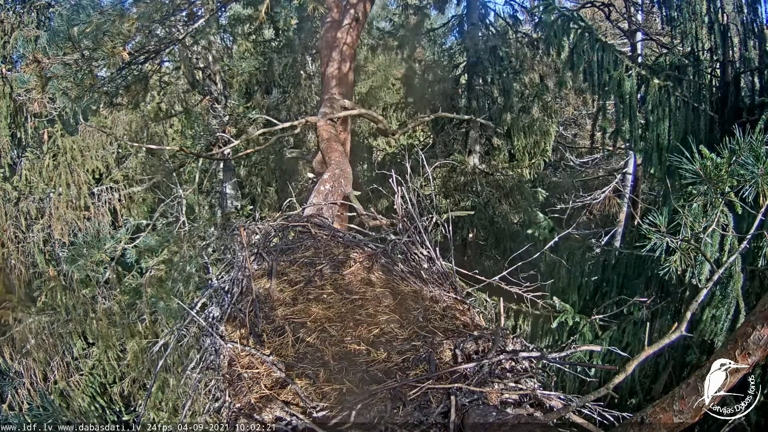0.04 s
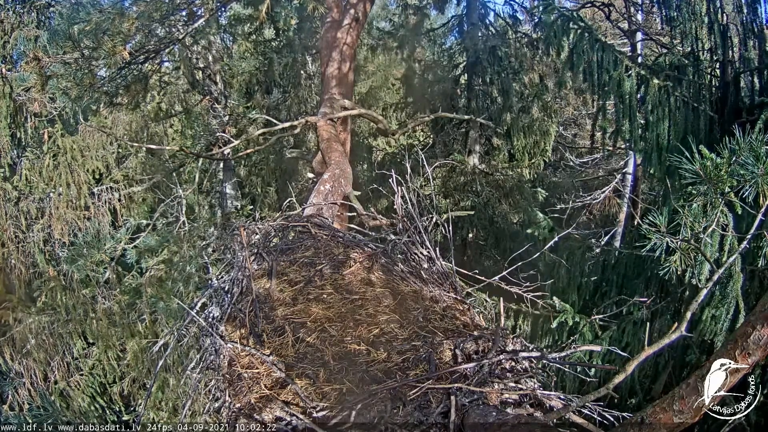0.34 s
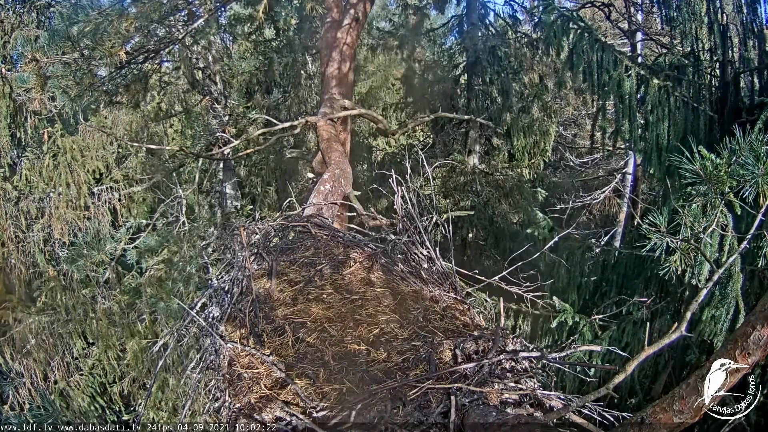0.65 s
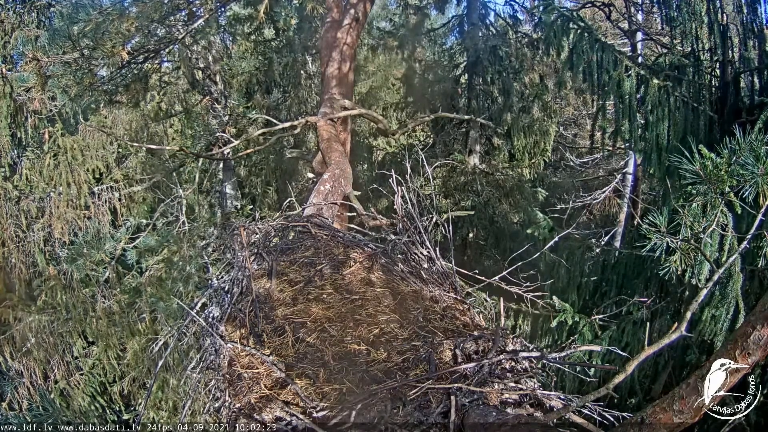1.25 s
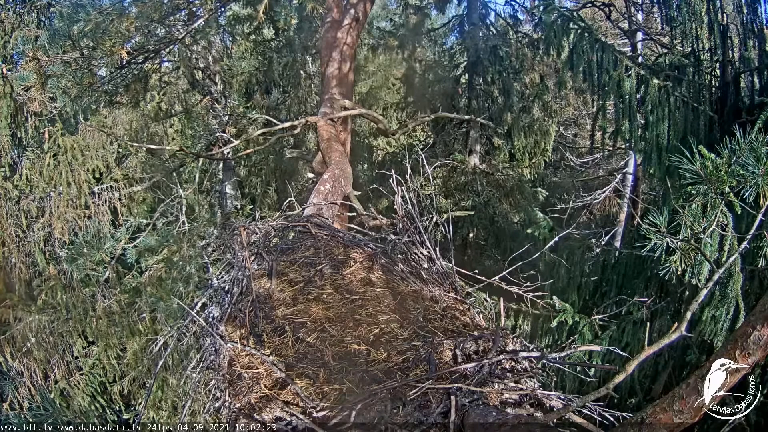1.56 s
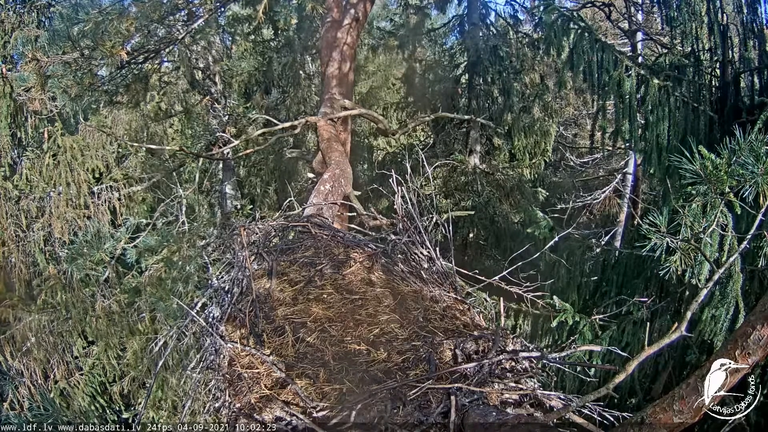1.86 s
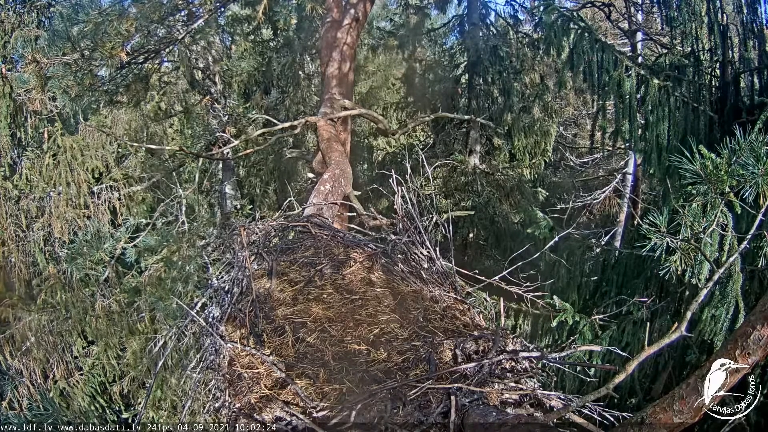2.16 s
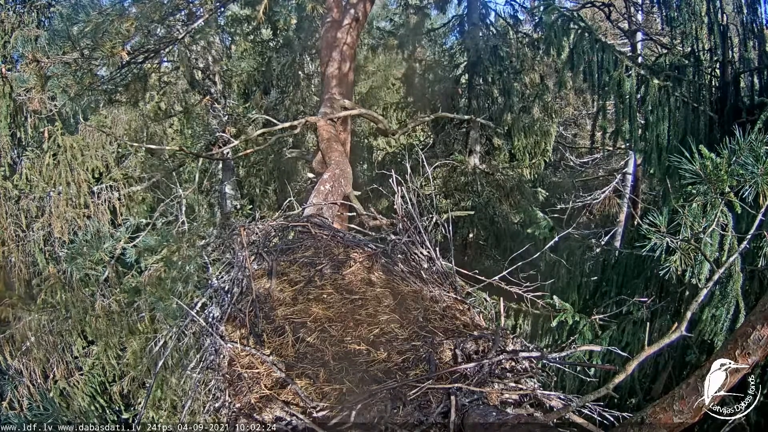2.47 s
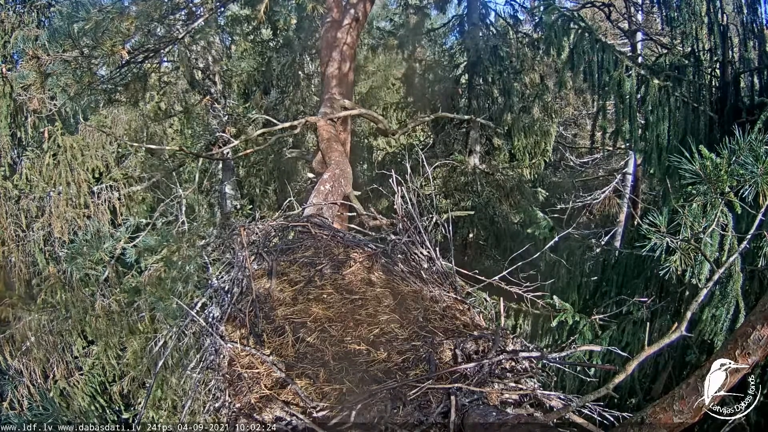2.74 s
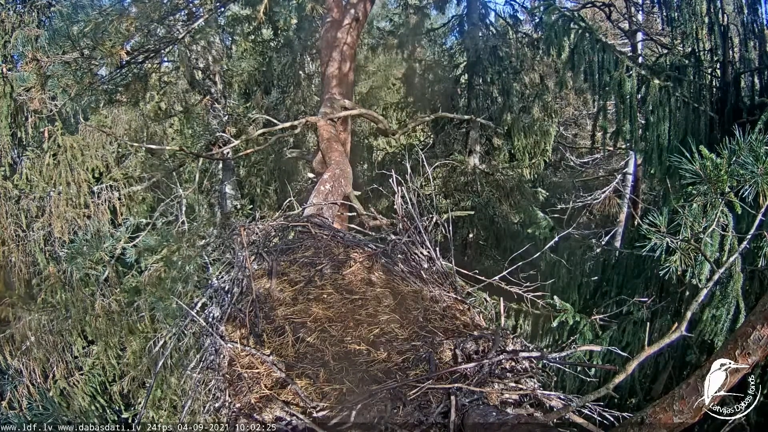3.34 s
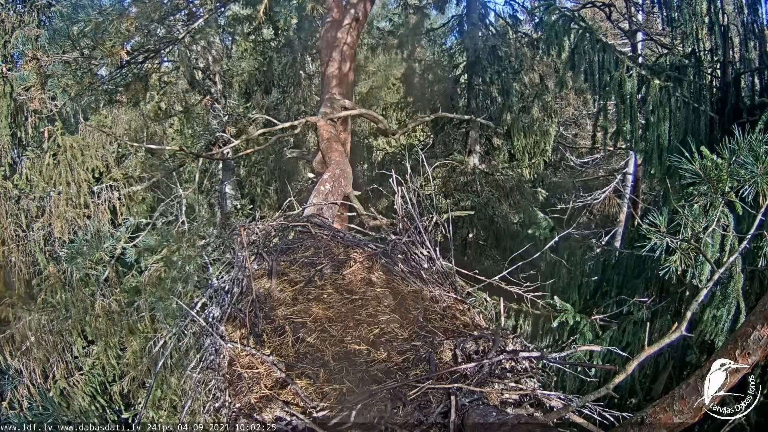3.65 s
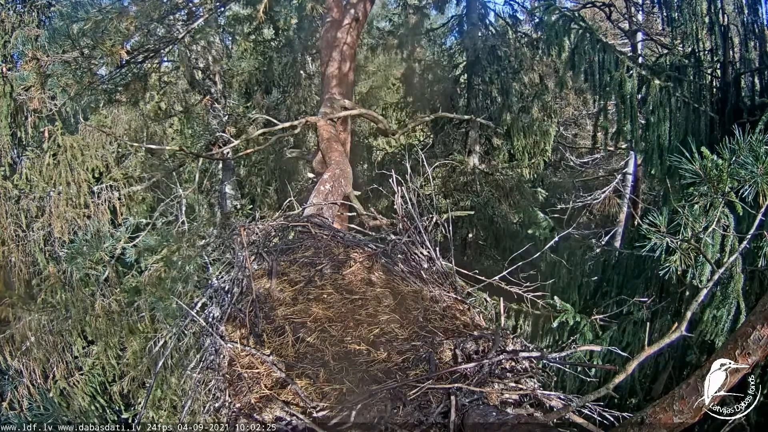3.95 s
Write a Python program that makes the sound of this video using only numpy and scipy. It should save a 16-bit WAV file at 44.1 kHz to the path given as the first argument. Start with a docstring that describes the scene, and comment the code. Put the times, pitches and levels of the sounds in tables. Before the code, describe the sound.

A raven gives three dry, rattling croaks in a quiet forest with faint bird chirps.

```python
"""A conifer forest, heard from a fixed microphone with a raven calling some way off.
Hiss, low rumble and a faint drone lie under distant chirps of small birds and one tick of a twig.
The raven gives three dry, rattling croaks. Each is eight slow beats of the syrinx, a soft opening
and a sharp closing snap, that ring the throat. Branches and trunks scatter the calls."""
import sys
import numpy as np
from scipy import signal
from scipy.fft import rfft, irfft
from scipy.io import wavfile
from scipy.ndimage import uniform_filter1d

SR = 44100
rng = np.random.default_rng(int(sys.argv[2]) if len(sys.argv) > 2 else 0)


def dump(signal):
    """Clip the signal to [-1, 1] and save it as 16-bit WAV at the path in sys.argv[1]."""
    limited = np.clip(np.atleast_2d(signal).T, -1, 1)
    pcm = np.round(limited * 32767).astype(np.int16)
    wavfile.write(sys.argv[1], SR, pcm)


N = 176400


def undb(db):
    """Decibels to gain."""
    return 10 ** (np.asarray(db) / 20)


def unit(x):
    """Scale to rms 1."""
    return x / np.sqrt(np.mean(x ** 2))


def add(out, start, sound):
    """Mix a sound in at a time in seconds."""
    i = int(np.clip(start * SR, 0, N - 1))
    out[i:i + len(sound)] += sound[:N - i]


def noise(points):
    """Noise of rms 1, its spectrum drawn through (Hz, dB) points."""
    hz, db = np.array(points, float).T
    bins_hz = np.maximum(np.fft.rfftfreq(N, 1 / SR), 1)
    gain = undb(np.interp(np.log(bins_hz), np.log(hz), db, left=-100, right=-100))
    return unit(irfft(rfft(rng.standard_normal(N)) * gain, N))


# The hiss and the rumble around the microphone. Each row: frequency in Hz, relative level in dB.
HISS_SPECTRUM = [(88, -15), (150, -2.5), (171, -2), (265, -4), (296, -5), (336, -2.5), (404, -8),
                 (713, -9.5), (1130, -13), (1850, -13.5), (2260, -9.5), (2870, -13.5), (3390, -17),
                 (12000, -19), (15600, -53), (22000, -120)]
RUMBLE_SPECTRUM = [(4, -4), (12, -1), (26, -3), (38, -6.5), (80, -5.5), (110, -13.5), (150, -14.5),
                   (220, -55.5)]


def forest_air():
    """Even hiss over a low rumble."""
    return undb(-60.5) * noise(HISS_SPECTRUM) + undb(-57) * noise(RUMBLE_SPECTRUM)


# The drone's course at the microphone. Each row: time in seconds, level in dB.
DRONE_LEVELS = [(0, -76), (1.15, -89), (1.4, -63), (3.0, -61.5), (4.0, -65.5)]


def drone(hz=68.4, skirt_hz=6.8):
    """A faint, narrow band of low noise that comes up after a second."""
    hum = noise([(hz - skirt_hz, -25), (hz, 0), (hz + skirt_hz, -25)])
    level_db = np.interp(np.arange(N) / SR, *np.array(DRONE_LEVELS).T)
    return undb(level_db) * hum


# Small birds, far off. Each row: start and length in seconds, first and last pitch in Hz, level in dB.
FAR_CHIRPS = [(0.193, 0.021, 3330, 3670, -67), (.26, .025, 3430, 3750, -70),
              (0.338, 0.022, 3320, 3770, -66), (0.441, 0.033, 3280, 3970, -70),
              (0.702, .033, 3200, 2870, -59), (1.339, 0.041, 3250, 2520, -62),
              (1.345, 0.022, 3770, 3580, -64), (1.52, .035, 3030, 3960, -63),
              (1.559, 0.06, 3960, 4510, -69), (2.183, .03, 3300, 3370, -65),
              (2.261, 0.036, 3200, 2720, -56.5), (3.25, 0.023, 3150, 2750, -66),
              (3.572, .13, 7400, 7850, -72), (3.9, 0.085, 7470, 7850, -69)]


def small_birds(waver_depth=0.028):
    """Short, slightly wavering whistled glides."""
    out = np.zeros(N)
    for start, length, from_hz, to_hz, db in FAR_CHIRPS:
        along = np.linspace(0, 1, int(length * SR))
        waver = unit(uniform_filter1d(rng.standard_normal(SR), size=120))[:len(along)]
        hz = (from_hz + (to_hz - from_hz) * along ** 1.32) * (1 + waver_depth * waver)
        arch = np.sqrt(4 * along * (1 - along))
        add(out, start, undb(db) * arch * np.sin(2 * np.pi * np.cumsum(hz) / SR))
    return out


# Reverberation among the trunks.
# Each row: low and high band edge in Hz, time to fall 60 dB in seconds, level in dB.
TRUNK_TAIL = [(200, 670, 0.93, -12.5), (600, 1600, 1.26, -9), (1930, 7900, 1.1, -1.5)]


def tree_scatter(calls, near_delay_s=0.0065, build_s=0.0052):
    """Quick scatter from nearby branches and a long diffuse tail from the trunks."""
    t = np.arange(2 * SR) / SR
    near = t * np.exp(-t / near_delay_s)
    response = undb(-8.5) * rng.standard_normal(len(t)) * near / np.sqrt(np.sum(near ** 2))
    for low_hz, high_hz, t60, db in TRUNK_TAIL:
        band = signal.butter(3, [low_hz, high_hz], "band", fs=SR, output="sos")
        echoes = signal.sosfilt(band, rng.standard_normal(len(t)))
        fade = np.exp(-np.log(1000) * t / t60) * (1 - np.exp(-t / build_s))
        response += undb(db) * echoes * fade / np.sqrt(np.sum(fade ** 2))
    return signal.fftconvolve(calls, response)[:N]


RISE_S = .003  # time allowed for a resonance to swell


def ring(t, hz, width_hz, lag_s_per_hz=1.3e-7):
    """A resonance that swells quickly and dies three times more slowly; higher ones crest a bit later."""
    since = t - RISE_S - lag_s_per_hz * hz
    age = np.pi * width_hz * since
    envelope = np.exp(-np.logaddexp(-3 * age, age))
    return envelope * np.cos(2 * np.pi * hz * since)


def twig(at_s=.7372):
    """A twig gives one small dry tick."""
    out = np.zeros(N)
    tick = ring(np.arange(SR // 20) / SR, hz=2200, width_hz=700)
    add(out, at_s - RISE_S, undb(-40) * tick)
    return out


def air_pulse(resonances, rasp_db=-8, rasp_decay_s=0.003):
    """One push of air with a trail of turbulence, through resonances (Hz, width in Hz, dB)."""
    t = np.arange(SR // 40) / SR
    trail = np.exp(-t / rasp_decay_s) * np.sqrt(2 / (rasp_decay_s * SR))
    push = undb(rasp_db) * rng.standard_normal(len(t)) * trail
    push[0] += 1
    throat = sum(undb(db) * ring(t, hz, width) for hz, width, db in resonances)
    return signal.fftconvolve(push, throat)[:len(t)]


# The raven's throat resonances besides the main one.
# Each row: frequency and width in Hz, gain in the snap and in the opening in dB.
THROAT_RESONANCES = [(344, 59, -18.5, -19.5), (500, 140, -25, -21), (643, 95, -26, -22.5),
                     (1100, 200, -25, -20), (1437, 186, -14.5, -27), (1830, 380, -19.5, -21.5),
                     (2464, 340, -13.5, -16), (2770, 316, -7, -22.5), (3210, 410, -14.5, -29),
                     (4050, 770, -20, -18.5)]


def syrinx_beat(main_hz, tuning):
    """The sharp closing snap and the soft opening of one beat, each ringing the throat."""
    snap, opening = [(main_hz, 207, 0)], [(main_hz, 116, -3.5)]
    for hz, width, snap_db, opening_db in THROAT_RESONANCES:
        snap.append((hz * tuning, width, snap_db))
        opening.append((hz * tuning, width, opening_db))
    return air_pulse(snap), air_pulse(opening)


def croak(rate, start, db, swell_db, from_hz, to_hz, tuning, second_db, last_db, beats=8):
    """A run of syrinx beats; the call swells and its main resonance rises as the bill opens."""
    opening_lead_s, opening_swell_db = .007, 6.5
    snap_jitter_s, opening_jitter_s, shimmer_db = .00008, .00019, 1.14
    out = np.zeros(N)
    for k, chance in enumerate(rng.standard_normal((beats, 4))):
        along, last = k / (beats - 1), k == beats - 1
        when = start - RISE_S + k / rate + .003 * last  # the syrinx slackens: the last beat is late
        snap, opening = syrinx_beat(from_hz + (to_hz - from_hz) * along, tuning)
        held_back = (1 - along) ** 2
        beat_db = db - swell_db * held_back + last_db * last
        snap_db = beat_db + second_db * (k == 1) + shimmer_db * chance[1]
        opening_db = beat_db - opening_swell_db * held_back + shimmer_db * chance[3]
        add(out, when + snap_jitter_s * chance[0], snap * undb(snap_db))
        add(out, when - opening_lead_s + opening_jitter_s * chance[2], opening * undb(opening_db))
    return out


# The raven, some way from the microphone. Each row: first snap in seconds, full level and swell in dB,
# main resonance at start and end in Hz, throat tuning as a ratio, then gains in dB for the second snap,
# the last beat, the direct treble and the treble sent into the trees.
RAVEN_CROAKS = [(0.8129, -32.5, 0.5, 915, 980, 1.005, -10, 0.5, 1.5, -1),
                (2.4342, -32.5, 1.5, 893, 915, 1, -4, -6.5, -0.5, 1),
                (3.3458, -29, 7, 820, 1006, 1.024, 1.5, -2.5, -8, 1.5)]
# The pace of each croak, in beats per second.
BEAT_RATES = (46.2, 44.4, 45.2)


def raven():
    """The croaks toward the microphone and out among the trees; turning away dulls the direct sound."""
    direct, spread = np.zeros(N), np.zeros(N)
    highpass = signal.butter(4, 1900, "high", fs=SR, output="sos")
    for rate, (*shape, direct_db, spread_db) in zip(BEAT_RATES, RAVEN_CROAKS):
        call = croak(rate, *shape)
        treble = signal.sosfiltfilt(highpass, call)
        direct += call + (undb(direct_db) - 1) * treble
        spread += call + (undb(spread_db) - 1) * treble
    return direct, spread


def scene():
    """Raven, small birds, twig and forest air, all meeting at one microphone."""
    raven_direct, raven_spread = raven()
    birds = small_birds()
    echoes = tree_scatter(raven_spread + undb(-5) * birds)
    return (forest_air() + drone() + birds + echoes + twig() + raven_direct)[None]


def record(dry, top_hz=12100, offset=.0125):
    """The recorder cuts the top and sits on a small constant offset."""
    lowpass = signal.ellip(10, .2, 70, top_hz, fs=SR, output="sos")
    return signal.sosfilt(lowpass, dry) + offset


dry = scene()
out = record(dry)
dump(out)
```